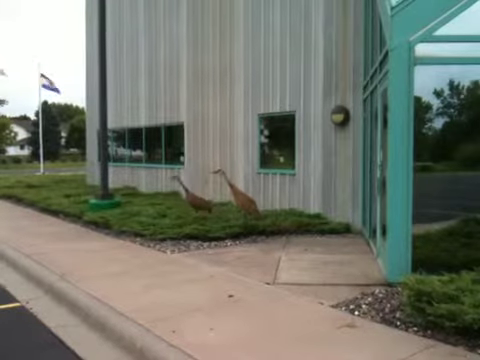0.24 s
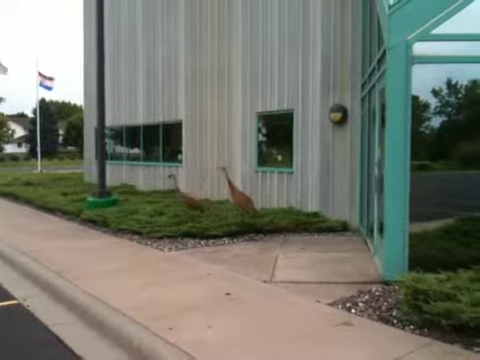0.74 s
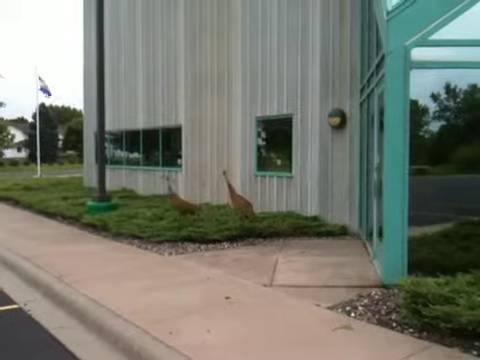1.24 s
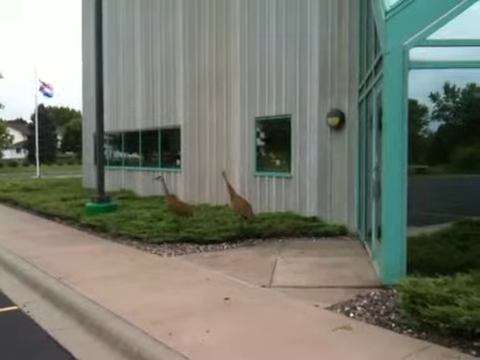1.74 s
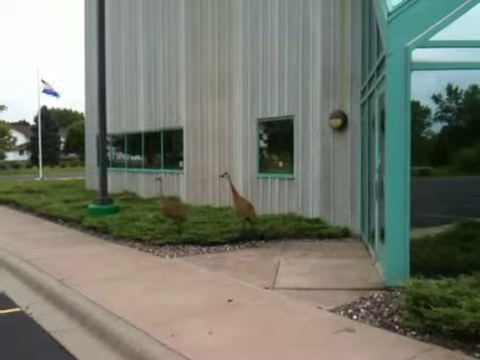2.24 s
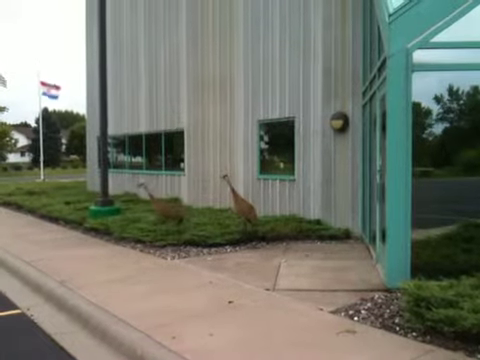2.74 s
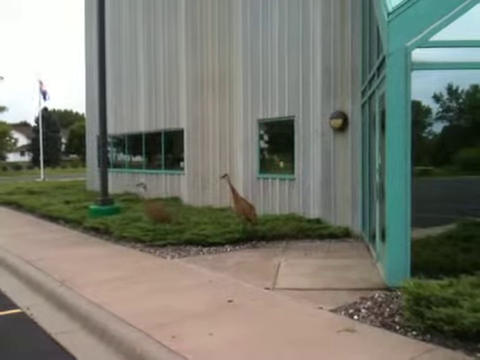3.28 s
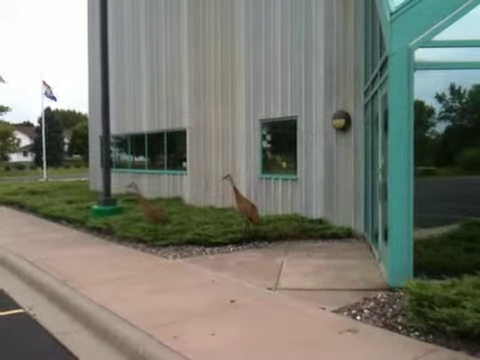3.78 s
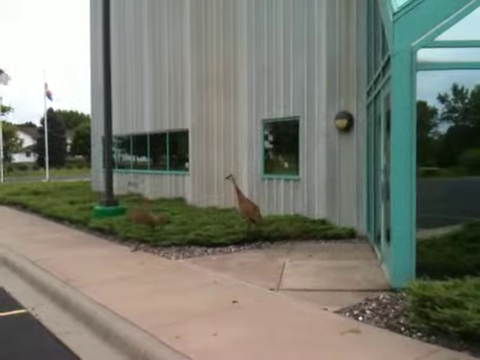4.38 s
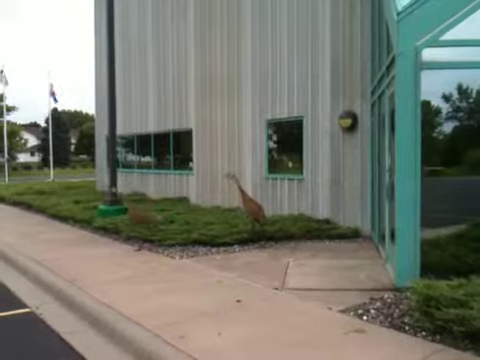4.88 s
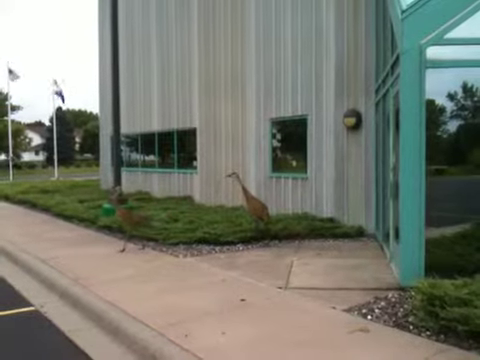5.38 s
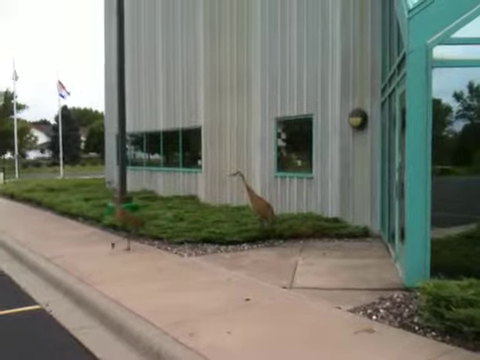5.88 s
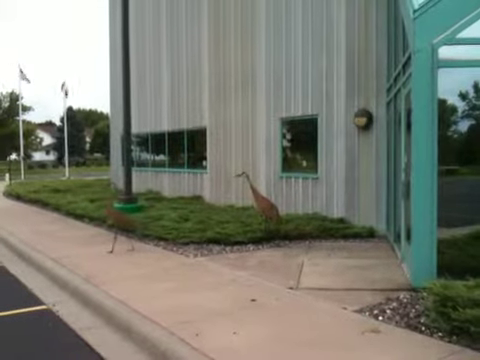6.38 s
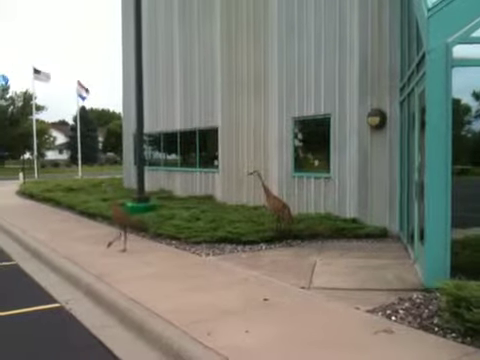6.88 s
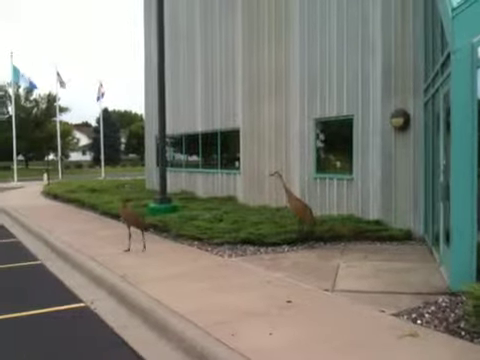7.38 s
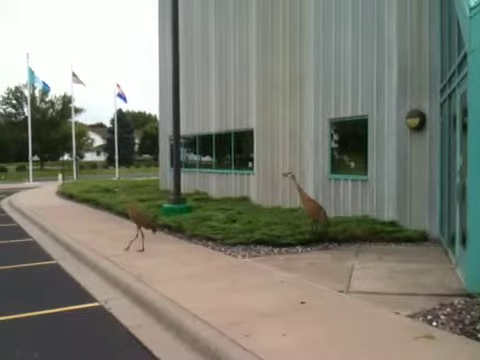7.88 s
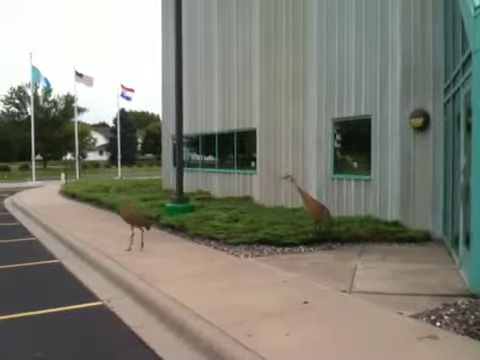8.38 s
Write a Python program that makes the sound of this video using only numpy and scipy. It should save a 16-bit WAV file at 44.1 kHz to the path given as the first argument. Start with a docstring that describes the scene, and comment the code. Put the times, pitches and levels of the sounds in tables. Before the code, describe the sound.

Two cranes give four loud, rolling rattle calls in interlocking high and low voices, echoing off a building over faint hum and distant traffic.

```python
"""A thin squeal over a rising nasal honk opens the first of four rolling rattle calls by two sandhill cranes.
Each roll is a run of very short notes in two interlocking voices, with a hoarse falling honk near its start.
The syrinx is a sum of overtones mixed with puffs of noise, coloured by a windpipe filter, over a pure fundamental.
A metal-clad wall, a glass porch and the yard return echoes; filtered noise makes the faint ventilation hum,
the distant traffic and the drones that rise and fade."""
import sys
import numpy as np
from scipy import signal
from scipy.fft import rfft, irfft, next_fast_len
from scipy.io import wavfile

SR = 44100
rng = np.random.default_rng(int(sys.argv[2]) if len(sys.argv) > 2 else 0)


def transcribe(signal):
    """Save signal, clipped to [-1, 1], as a 16-bit WAV file at the path in sys.argv[1]."""
    frames = np.atleast_2d(signal).T
    limited = np.clip(frames, -1, 1)
    pcm = np.round(limited * 32767).astype(np.int16)
    wavfile.write(sys.argv[1], SR, pcm)


N = 380505
EDGE_HZ = 15900  # upper limit of the overtones and of the final band

# The four rolls, each led by the higher voice: start t/s, top pitch before warm-up and sag f/Hz,
# base levels of fundamental, overtones and closing hoot, each level/dB, top-octave gain of all bird sound level/dB
ROLLS = [(0.143, 1088, -15.5, -17.2, -20, 4), (2.398, 1080, -19.3, -18, -17.3, 4),
         (4.568, 1055, -22, -19.2, -15.8, -1.5), (7.802, 1010, -18.5, -28.7, -14, -5)]


def gain_of(db):
    """Level definition: decibels to amplitude ratio."""
    return 10 ** (np.asarray(db) / 20)


def evened(x):
    """Normalization: scales a signal to unit rms."""
    return x / np.sqrt(np.mean(x ** 2) + 1e-20)


def read(points, hz):
    """Spectral interpolation: reads a table of values along a logarithmic frequency axis."""
    f, value = np.transpose(points)
    return np.interp(np.log(hz + 1), np.log(f + 1), value)


def add(mix, s, sound):
    """Superposition: sums a sound into the mix from time s, cut at the end of the mix."""
    part = mix[max(round(s * SR), 0):][:len(sound)]
    part += sound[:len(part)]


def wander(count, hz):
    """Random modulation: straight lines join normal random values drawn hz times a second."""
    knots = rng.standard_normal(count)
    return np.interp(np.arange(count) * hz / SR, np.arange(count), knots)


def swell(t, centre, rise, fall):
    """Envelope: a Gaussian attack, then a rounded release with an exponential tail."""
    attack = np.exp(-((t - centre) / rise) ** 2)
    release = 1 / np.cosh((t - centre) / fall)
    return np.where(t < centre, attack, release)


def drone(count, centre_hz, width_hz):
    """Narrow-band noise: one resonance, as wide as given at half amplitude, makes a wavering tone."""
    size = next_fast_len(count, True)
    hz = np.fft.rfftfreq(size, 1 / SR)
    resonance = 1 / (1 + (2 * (hz - centre_hz) / width_hz) ** 2)
    noise = irfft(rfft(rng.standard_normal(size)) * resonance, size)
    return evened(noise[:count])


def traffic():
    """Spectral shaping: broadband noise takes the colour of distant traffic and drifts in level."""
    # Relative noise spectrum of the outdoor air: f/Hz, level/dB
    air_colour = [(15, -92), (25, -56), (84, -18), (102, -12), (134, -3.5), (242, -2.5), (270, -7.5),
                  (335, -5), (416, -10), (503, -6.5), (545, -8), (734, -5), (1890, -15), (2910, -29),
                  (16000, -45)]
    # Slow course of its mean level: t/s, level/dB
    air_level = [(0, -49.5), (1.5, -51.5), (2.1, -50), (3.5, -51), (6.8, -52.5), (8.6, -47.5)]
    hz = np.fft.rfftfreq(N, 1 / SR)
    air = evened(irfft(rfft(rng.standard_normal(N)) * gain_of(read(air_colour, hz)), N))
    course_db = np.interp(np.arange(N) / SR, *np.transpose(air_level))
    return air * gain_of(course_db + .5 * wander(N, 7))


def ventilation():
    """Narrow-band resonance: each hum tone swells and fades on its own."""
    # Tones of the ventilation plant: centre f/Hz, half-amplitude width f/Hz, mean level/dB
    hum_tones = [(121, 6, -71), (152, 8, -67), (239.7, 8, -69.5), (719, 38, -64.5)]
    swell_db, swell_rate_hz = 1.3, 1.3  # size and rate of the random level knots
    out = np.zeros(N)
    for f, width, db in hum_tones:
        out += gain_of(db + swell_db * wander(N, swell_rate_hz)) * drone(N, f, width)
    return out


def passing_drones():
    """Amplitude modulation: narrow bands of distant traffic and machine drone rise and fade once each."""
    # Drones: middle t/s, length t/s, centre f/Hz, half-amplitude width f/Hz, level before the fade level/dB
    drone_swells = [(1.1, .76, 126.3, 14, -62), (1.755, 1.15, 674, 210, -56), (2.05, .85, 505, 30, -55),
                    (3.7, .72, 498, 21, -60.5), (4.3, 1.4, 121, 8, -62), (6.05, .62, 147, 8.4, -63)]
    out = np.zeros(N)
    for s, length, f, width, db in drone_swells:
        fade = np.hanning(round(length * SR))
        add(out, s - length / 2, gain_of(db) * fade * drone(len(fade), f, width))
    return out


def background():
    """Superposition of independent sources: traffic, ventilation and passing drones."""
    return traffic() + ventilation() + passing_drones()


def scatter(count, per_s):
    """Diffuse scattering: sparse impulses of random time, sign and size."""
    return rng.standard_normal(count) * (rng.random(count) < per_s / SR)


def yard(x, wet_db=-26):
    """Late reverberation: far walls give distinct echoes; a faint tail decays at a rate set by frequency."""
    # Relative colour of the tail: f/Hz, level/dB
    tail_colour = [(200, -17), (800, 3), (2000, 9), (5000, 0.5), (9000, -11.5), (15000, -1.5)]
    # Time for a 60 dB decay: f/Hz, t/s
    tail_t60 = [(200, 2.5), (800, 1.4), (2000, 1.2), (5000, 1.8), (10000, 1.5), (15000, 0.51)]
    # Distinct returns, dulled above 8 kHz: delay t/s, level/dB
    far_walls = [(.157, -40), (.318, -38.5)]
    hz, t, z = signal.stft(scatter(SR * 3 // 2, 1400), SR, nperseg=256)
    decay_db = -60 * t / read(tail_t60, hz)[:, None]
    build_up = 1 - np.exp(-t / .011)
    z *= gain_of(read(tail_colour, hz)[:, None] + decay_db) * build_up
    tail = signal.istft(z, SR, nperseg=256)[1]
    out = gain_of(wet_db) * signal.fftconvolve(x, tail / np.linalg.norm(tail))[:N]
    dulled = signal.lfilter(*signal.butter(2, 8000, fs=SR), x)
    for delay, db in far_walls:
        add(out, delay, gain_of(db) * dulled)
    return out


def wall(x, delay=0.012, echo_db=-13, scatter_db=-12.0, scatter_t60=0.12, dull_hz=4500):
    """Early reflection: the ribbed wall returns one slap and a spray of small echoes, all low-passed."""
    t = np.arange(SR // 8) / SR
    spray = np.sign(scatter(len(t), 1100)) * gain_of(-60 * t / scatter_t60) * (t > .001)
    response = gain_of(scatter_db) * spray / np.linalg.norm(spray)
    response[round(delay * SR)] += gain_of(echo_db)
    dulled = signal.lfilter(*signal.butter(1, dull_hz, fs=SR), response)
    return signal.fftconvolve(x, dulled)[:N]


def glass_porch(x, delay=.018, echo_db=-19, dull_hz=7000):
    """Specular reflection: the glass entrance next to the higher bird returns one low-passed slap."""
    out = np.zeros(N)
    add(out, delay, gain_of(echo_db) * signal.lfilter(*signal.butter(1, dull_hz, fs=SR), x))
    return out


def turned_away(voice, from_s, boost_db):
    """Directivity: a bird facing away beams its overtones at the building instead of at the listener."""
    overtones = signal.sosfilt(signal.butter(3, 1600, "high", fs=SR, output="sos"), voice)
    return gain_of(boost_db) * overtones * (np.arange(N) / SR > from_s)


def aimed(x, beam_hz=9000):
    """Directivity: the highest overtones leave the bill in a narrow beam that turns from roll to roll."""
    top = signal.sosfiltfilt(signal.butter(2, beam_hz, "high", fs=SR, output="sos"), x)
    starts, *_, brilliance_db = np.transpose(ROLLS)
    top_gain = gain_of(np.interp(np.arange(N) / SR, starts, brilliance_db))
    return x + top * (top_gain - 1)


def ringing(points, size=1024):
    """Minimum phase: the causal impulse response that belongs to a given magnitude spectrum."""
    log_gain = np.log(gain_of(read(points, abs(np.fft.fftfreq(size, 1 / SR)))))
    spectrum = np.exp(np.conj(signal.hilbert(log_gain)))
    return np.fft.ifft(spectrum).real[:size // 2]


def tone(hz):
    """Phase integration: a pure fundamental of unit rms follows a pitch curve."""
    return np.sqrt(2) * np.cos(2 * np.pi * np.cumsum(hz) / SR)


def syrinx(hz, rough, throat, jitter, smear_s=0.00078):
    """Source and filter: membranes slap shut once a cycle and puff air; the windpipe colours the overtones."""
    turns = np.cumsum(hz * (1 + jitter * wander(len(hz), 900))) / SR
    k = np.arange(2, 30)[:, None]  # overtones only, the fundamental is a separate tone
    # dispersion in the long windpipe: delay grows with frequency, reaching smear_s at EDGE_HZ
    lag = smear_s * (k * hz.mean()) ** 2 / EDGE_HZ / 2
    slaps = (np.cos(2 * np.pi * (k * turns - lag)) * (k * hz < EDGE_HZ)).sum(0)
    slaps *= gain_of(2 * wander(len(hz), 1100))
    puffs = (0.59 + np.exp(-(turns % 1) / 0.27)) * rng.standard_normal(len(hz))
    rough = np.clip(rough, 0, 1)  # share of the power that is noise
    drive = np.sqrt(1 - rough) * evened(slaps) + np.sqrt(rough) * evened(puffs)
    return evened(signal.fftconvolve(drive, throat)[:len(hz)])


def honk(length, over_db, first_hz, aimed_hz, glide, tone_db, rough):
    """Frequency glide: a longer nasal note nears its pitch exponentially, flutters, brightens and stops short."""
    # Relative colour of the honks: f/Hz, level/dB
    nasal = [(300, -27.5), (800, 1), (1170, 10.5), (1450, -0.5), (1720, 7.5), (2300, -1.5), (2750, -12.5),
             (3550, 4.5), (5100, -4), (7000, -5.5), (10000, -17), (15000, -27)]
    u = np.linspace(0, 1, round(length * SR))  # elapsed share of the note
    hz = aimed_hz + (first_hz - aimed_hz) * np.exp(-u * length / glide)
    effort = signal.windows.tukey(len(u), .3)
    flutter_db = 3 * np.sin(2 * np.pi * (75 * length * u + rng.random()))
    flutter = gain_of(flutter_db + 1.2 * wander(len(u), 200))
    hoarse = tone(hz * (1 + .05 * rough * wander(len(u), 180)))
    hoarse *= gain_of(3.1 * rough * wander(len(u), 300))
    rasp = syrinx(hz, rough, ringing(nasal), jitter=.07 * rough)
    rasp *= swell(u, 0.63, 0.44, 0.27) * flutter
    return effort * (gain_of(tone_db) * hoarse + gain_of(over_db) * rasp)


def honks():
    """Frequency glide: every call has one rising and one falling honk; the first also has a squeal."""
    # Rising honk that opens each call: start t/s, length t/s, overtones before envelope level/dB
    opening_honks = [(.0, 0.054, -29), (2.253, 0.072, -28.5), (4.425, .075, -29), (7.658, .08, -38.5)]
    # Hoarse falling honk after each roll's first note: start t/s, aimed pitch f/Hz,
    # overtones before envelope level/dB
    falling_honks = [(.176, 545, -26.5), (2.428, 543, -27), (4.596, 543.4, -24.5), (7.838, 640, -30)]
    # Thin rising squeal over the first honk: start t/s, length t/s, overtones before envelope level/dB
    squeal = (.013, .06, -33)
    out = np.zeros(N)
    for s, length, over_db in opening_honks:
        add(out, s, honk(length, over_db, first_hz=522, aimed_hz=622, glide=.05, tone_db=-44.0, rough=.22))
    for s, aimed_hz, over_db in falling_honks:
        add(out, s, honk(.066, over_db, first_hz=700, aimed_hz=aimed_hz, glide=.016, tone_db=-37, rough=.55))
    start_s, length, over_db = squeal
    add(out, start_s, honk(length, over_db, first_hz=717, aimed_hz=818, glide=.029, tone_db=-27, rough=.2))
    return out


def roll_at(s):
    """Event grouping: the roll a note belongs to, counted from half a second before the roll's start."""
    return ROLLS[sum(s > row[0] - .5 for row in ROLLS[1:])]


def tiring(s, accent_db, voice, air):
    """Breath supply: pitch warms up early in the roll, then pitch and level sag as the air runs out."""
    warm_up_share, warm_up_s = .04, .06  # a roll starts a little flat
    rasp_follows = .35  # share of a note's accent that reaches its overtones
    top_hz, tone_db, over_db, hoot_db = voice
    lasts_s, steepness, sag, tone_fade_db, over_fade_db, hoot_fade_db = air
    age = max(s - roll_at(s)[0], 0)
    spent = (age / lasts_s) ** steepness
    hz = top_hz * (1 - warm_up_share * np.exp(-age / warm_up_s) - sag * spent)
    tone_db = tone_db + accent_db + tone_fade_db * spent ** 2
    over_db = over_db + rasp_follows * accent_db + over_fade_db * spent ** 2
    hoot_db = hoot_db + accent_db + hoot_fade_db * spent ** 2
    return s, hz, tone_db, over_db, hoot_db


def rattle(notes, pipe, rough, jitter, rasp_at, rasp_fall, tone_at, tone_fall, hoot_at, hoot_fall,
           pipe_hz, pull, catch_db=-21):
    """Resonator coupling: a harsh burst of a few cycles, then a hoot pulled towards the windpipe's pitch."""
    out, throat = np.zeros(N), ringing(pipe)
    lead = .008  # s of sound ahead of the note's nominal time
    t = np.arange(2600) / SR - lead
    sunk = 1 / (1 + np.exp(-(t - .008) / 0.001))
    # the overtones hold their pitch until the burst is nearly over
    slack = 1 / (1 + np.exp(-(t - .012) / 0.0018))
    # the membranes stir softly before they slap
    catch = gain_of(catch_db) * swell(t, -.004, 0.0018, 0.0017)
    for s, hz, tone_db, over_db, hoot_db in notes:
        drop_hz = pull * (pipe_hz - hz)
        burst = swell(t, rasp_at, 0.0018, rasp_fall)
        rasp = burst * syrinx(hz + drop_hz * slack, rough, throat, jitter)
        rasp *= np.linalg.norm(burst) / np.linalg.norm(rasp)  # equal energy before its level is set
        strike = gain_of(tone_db) * (swell(t, tone_at, 0.0024, tone_fall) + catch)
        hoot = gain_of(hoot_db) * swell(t, hoot_at, 0.0027, hoot_fall)
        body = np.hypot(strike, hoot)
        body *= gain_of(2 * sunk * wander(len(t), 300))  # the hoot wavers raggedly in level
        unsteady = 1 + .035 * wander(len(t), 350)
        fundamental = body * tone((hz + drop_hz * sunk) * unsteady)
        add(out, s - lead, fundamental + gain_of(over_db) * rasp)
    return out


def low_voice():
    """Source and filter: the lower, rougher voice joins every roll with the same base pitch and levels."""
    # Notes of all four rolls in time order: t/s, accent level/dB
    low_notes = [(.316, 1.5), (.393, 0.5), (.461, 0.5), (.522, 1.5), (.581, -1), (.631, -1.5), (.677, -1.5),
                 (.718, -7.5), (2.577, 1.5), (2.653, 0.5), (2.721, 0.5), (2.784, 1.5), (2.842, .5),
                 (2.894, 0.5), (2.944, 0.5), (2.987, 0.5), (3.022, -12.5), (4.737, 1.5), (4.813, -1),
                 (4.882, 0), (4.944, 3.5), (5.002, 0), (5.055, -2), (5.101, 0.5), (5.146, -2.5),
                 (7.974, -2.5), (8.049, 0), (8.116, -1.5), (8.179, 0.5), (8.236, 2), (8.29, 0.5),
                 (8.339, -0.5), (8.384, 0), (8.428, -9.5)]
    # Overtone colour of the coiled windpipe and bill: f/Hz, level/dB
    low_pipe = [(100, -11.5), (500, -10.5), (1250, -0.5), (1600, 8.5), (2200, -3), (2750, -3), (4300, 3.5),
                (5900, -1.5), (7600, 1), (9200, -6), (10200, -2), (12200, -19), (15500, -16)]
    # Base values: top pitch before warm-up and sag f/Hz, fundamental, overtones, closing hoot level/dB
    low_base = (822, -14.7, -14.7, -18.9)
    # Breath: air lasts t/s, steepness, pitch sag share, fades of fundamental, overtones, hoot level/dB
    low_air = (.6, 5, .165, -3.5, -13, -17)
    notes = [tiring(s, db, low_base, low_air) for s, db in low_notes]
    return rattle(notes, low_pipe, rough=0.59, jitter=0.037, rasp_at=0.0016, rasp_fall=0.0038, tone_at=.0032,
                  tone_fall=0.0033, hoot_at=.0125, hoot_fall=.005, pipe_hz=667.5, pull=.5)


def high_voice():
    """Source and filter: the higher voice leads, with base pitch and levels set for each roll."""
    # Notes of all four rolls in time order: t/s, accent level/dB
    high_notes = [(.143, -.5), (.211, 1), (.273, .5), (.326, -.5), (.379, 1), (.426, -1.5), (.475, -0.5),
                  (.568, -1.5), (.615, -3.5), (2.398, 0), (2.469, 1), (2.531, .5), (2.586, -1.5),
                  (2.635, 2), (2.684, -1.5), (2.732, -3), (2.776, 0), (2.824, -1), (2.871, -.5),
                  (4.568, 0.5), (4.638, .5), (4.697, 0), (4.75, 0), (4.8, -.5), (4.848, .5), (4.897, -1),
                  (4.988, 0.5), (5.034, -1), (7.802, 0), (7.874, 0), (7.937, -0.5), (7.989, 2), (8.04, 0.5),
                  (8.089, .5), (8.136, 1), (8.187, 2.5), (8.279, 1)]
    # Overtone colour of the coiled windpipe and bill: f/Hz, level/dB
    high_pipe = [(100, -15.5), (500, -15), (1400, 3), (2050, 6), (2600, -9), (3200, 1.5), (5300, 0.5),
                 (7500, 1.5), (9200, -14.5), (10500, -9.5), (13200, -25), (15000, -22)]
    # Breath: air lasts t/s, steepness, pitch sag share, fades of fundamental, overtones, hoot level/dB
    high_air = (0.54, 4, .285, -1.5, -12, -15)
    notes = [tiring(s, db, roll_at(s)[1:5], high_air) for s, db in high_notes]
    return rattle(notes, high_pipe, rough=0.36, jitter=.024, rasp_at=.0019, rasp_fall=0.0051, tone_at=.002,
                  tone_fall=0.0019, hoot_at=.0125, hoot_fall=.0036, pipe_hz=790, pull=0.74)


def scene():
    """Superposition: direct sound of both birds, their reflections and the background."""
    high = high_voice()
    birds = high + low_voice() + honks()
    beamed = birds + turned_away(high, from_s=6.5, boost_db=10.5)
    echoes = glass_porch(high) + wall(beamed) + yard(beamed)
    return (aimed(birds) + echoes + background())[None]


def record(dry):
    """Soft saturation rounds off the very highest peaks, then a linear-phase low-pass limits the band."""
    ceiling, knee = .75, 6
    rounded = dry / (1 + abs(dry / ceiling) ** knee) ** (1 / knee)
    low_pass = signal.firwin(511, EDGE_HZ, window=("kaiser", 9), fs=SR)
    return signal.oaconvolve(rounded, low_pass[None], "same")


dry = scene()
out = record(dry)
transcribe(out)
```